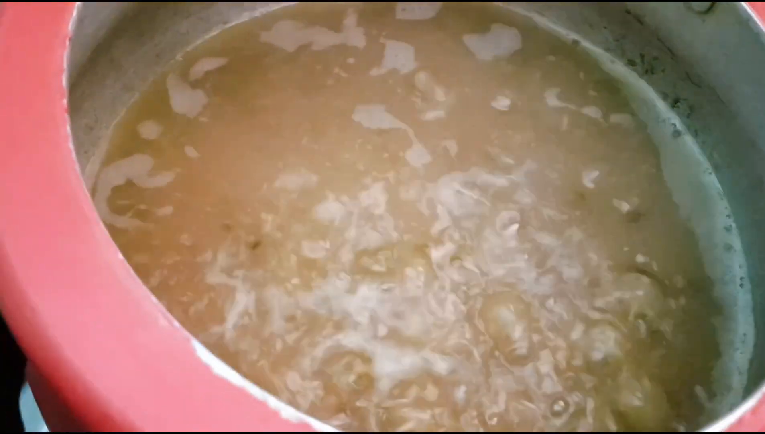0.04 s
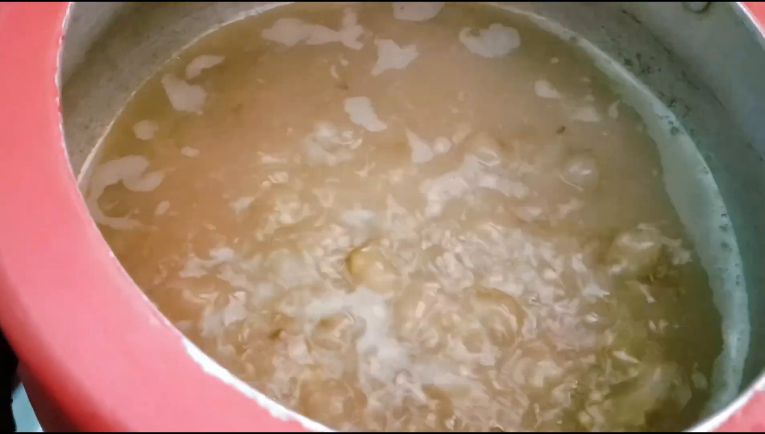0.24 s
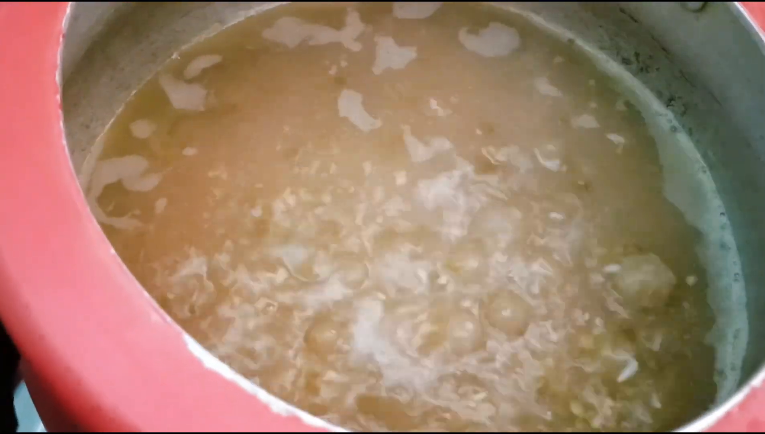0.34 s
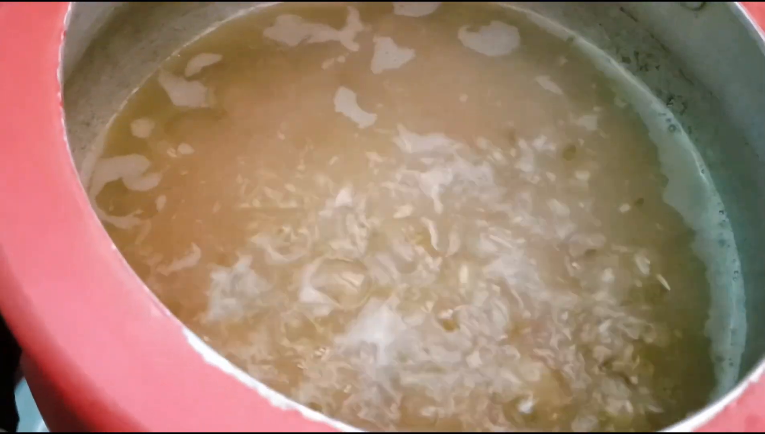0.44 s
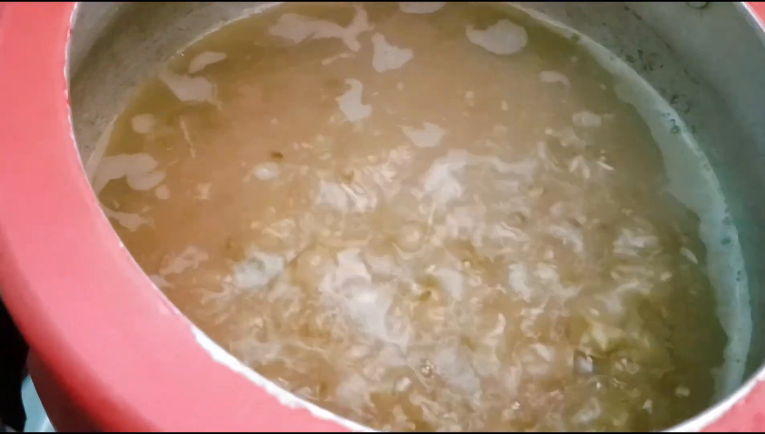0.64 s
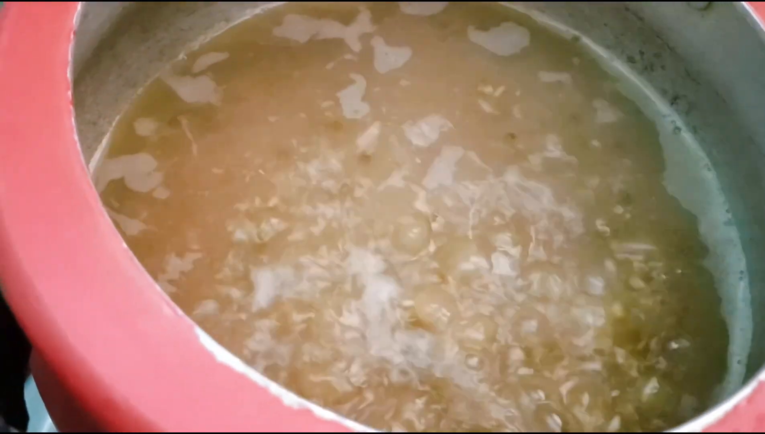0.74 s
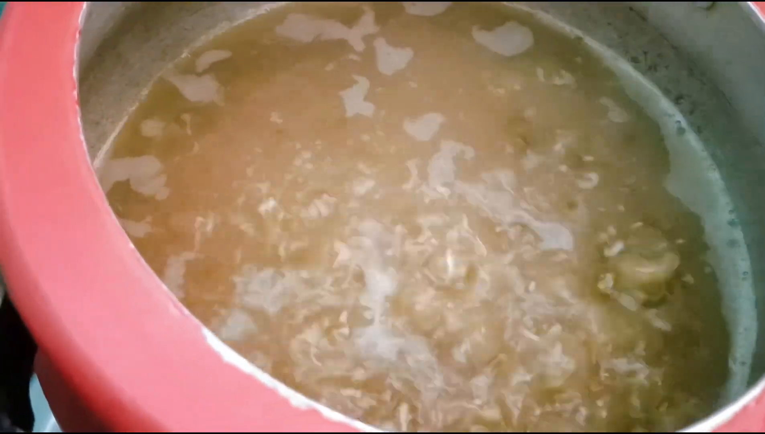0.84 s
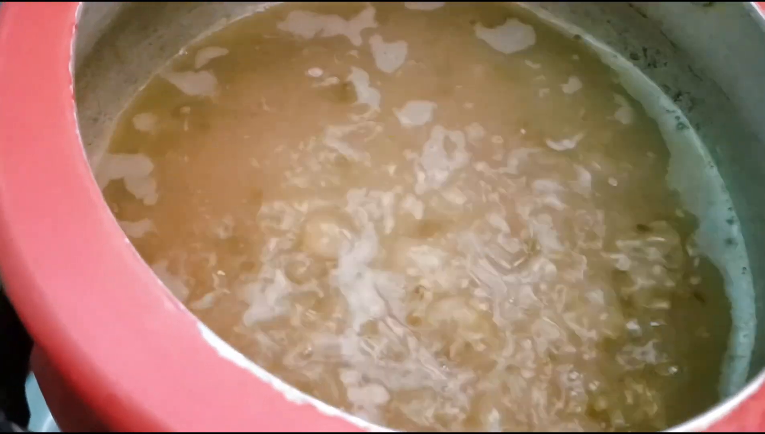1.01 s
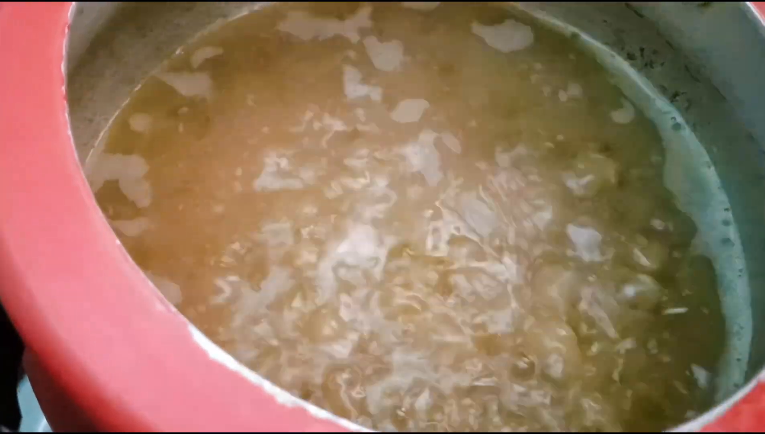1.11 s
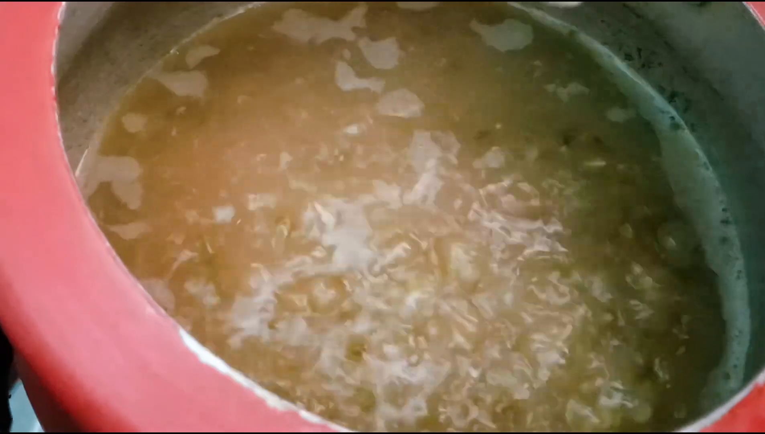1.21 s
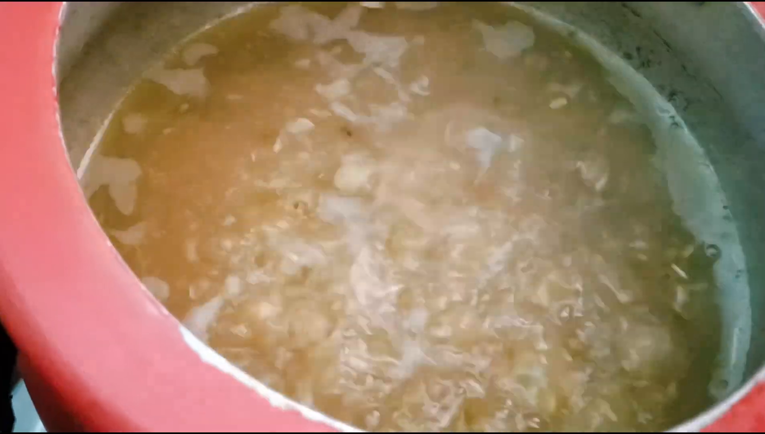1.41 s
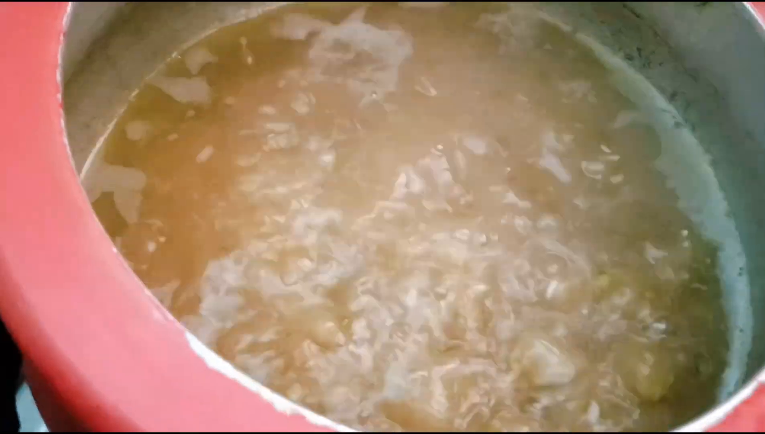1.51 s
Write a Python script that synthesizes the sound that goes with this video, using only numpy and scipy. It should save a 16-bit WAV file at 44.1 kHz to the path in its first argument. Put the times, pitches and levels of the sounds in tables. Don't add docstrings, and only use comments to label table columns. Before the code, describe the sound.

Close to a pot, one hard splashy plop and a gentler one follow quickly, then quiet bubbling swells with small pops, a brief spit on the hot rim, over low stove rumble and faint hiss.

```python
import sys
import numpy as np
from scipy import signal
from scipy.fft import rfft, irfft
from scipy.io import wavfile
from scipy.ndimage import uniform_filter1d

SR = 44100
rng = np.random.default_rng(int(sys.argv[2]) if len(sys.argv) > 2 else 0)


def decibels_to_gain(level_db):
    exponent = np.asarray(level_db, float) / 20
    return 10 ** exponent


def generate_wav(sig):
    pcm = np.round(np.clip(np.atleast_2d(sig).T, -1, 1) * 32767).astype(np.int16)
    wavfile.write(sys.argv[1], SR, pcm)


N = 68355
SIDES = np.array([[1], [-1]])

# f/Hz, side-mid level/dB
HISS_SIDE = [(30, -8), (150, -19), (380, -8), (1290, 0), (6000, -1), (8300, -14), (11700, -34), (12500, -1)]
# f/Hz, left-right level/dB
HISS_PAN = [(60, 1), (2400, -2), (4400, 3.5), (15000, 3.5)]


def unit(x):
    return x / np.sqrt(np.mean(x ** 2))


def colour(x, table, pan=((1, 0), (2, 0))):
    log_hz = np.log(np.maximum(np.fft.rfftfreq(4096, 1 / SR), 1))

    def read(points):
        hz, db = np.array(points, float).T
        return np.interp(log_hz, np.log(np.maximum(hz, 1)), db)

    gain_db = np.maximum(read(table), -60) + SIDES * read(pan) / 2
    cepstrum = irfft(np.log(decibels_to_gain(gain_db)))
    folded = np.concatenate([cepstrum[:, :1], 2 * cepstrum[:, 1:2048], np.zeros((2, 2048))], axis=1)
    response = irfft(np.exp(rfft(folded)))
    return signal.fftconvolve(x * np.ones((2, 1)), response, axes=1)[:, :N]


def band(x, hz, width):
    return signal.lfilter(*signal.iirpeak(hz, hz / width, fs=SR), x)


def ring(x, modes, split=0):
    out = 0
    for k, (hz, db, t60, pan_db) in enumerate(modes):
        for side in (1, -1):
            detune = side * (-1) ** k * split / 2 * (hz > 400)
            twin_hz = hz * (1 + detune)
            pole = np.exp(2j * np.pi * twin_hz / SR - np.log(1000) / (t60 * SR))
            mode = signal.lfilter([1], [1, -pole], x).imag
            out = out + (SIDES == side) * decibels_to_gain(db + side * pan_db / 2) * mode
    return out


def walk(rate):
    k = int(SR / rate)
    held = np.repeat(rng.standard_normal(N // k + 1), k)
    return unit(uniform_filter1d(uniform_filter1d(held, k), k)[:N])


def bubble(t, hz, cycles, glide):
    turns = np.maximum(t, 0) * hz
    fade = np.exp(-3 * turns / cycles) * (1 - np.exp(-turns / 0.86))
    return np.sin(2 * np.pi * turns * (1 + glide * turns / cycles / 2)) * fade


def splatter(t, stages, spray, pan):
    drops = rng.standard_normal((2, N)) * decibels_to_gain(3.5 * np.minimum(rng.exponential(size=(2, N)), 3))
    apart = 1.15
    right = (drops[0] + apart * drops[1]) / np.hypot(1, apart)
    voice = unit(colour(np.array([drops[0], right]), spray, pan))
    out = np.zeros((2, N))
    for start, length, db, fade_db, top_hz in stages:
        at = (t - start) / length
        level = decibels_to_gain(db + fade_db * np.clip(at, 0, 1)) * (at >= 0) * (at < 1)
        gate = uniform_filter1d(level, size=31)
        edge = ((330, top_hz), "band") if top_hz < SR / 4 else (1400, "high")
        out += gate * signal.lfilter(*signal.butter(3, *edge, fs=SR), voice)
    return out


def struck_pot(t, slaps, modes, late_s, ring_end_s, contact):
    def push(s):
        return np.exp(-((t - s) * SR / contact) ** 2)

    first_s, first_db = slaps[0]
    first = ring(push(first_s), modes, split=.035)
    short = [(hz, db, t60 * .04, pan_db) for hz, db, t60, pan_db in modes]
    one_thud = ring(push(.01), short)
    thuds = ring(sum(decibels_to_gain(db) * push(s) for s, db in slaps[1:]), short) / np.abs(one_thud).max()
    slap_db, ring_db, damp_s = -3, 5.5, .0015
    damped = np.exp(-np.maximum(t - ring_end_s, 0) / damp_s)
    struck = damped * (decibels_to_gain(slap_db) * thuds - decibels_to_gain(ring_db + first_db) * first / np.abs(first).max())
    return np.array([struck[0], np.interp(t - late_s, t, struck[1])])


def lump_sound(x):
    return signal.sosfilt(signal.butter(3, 123, "high", fs=SR, output="sos"), x)


def first_lump(t):
    # t/s, length/s, level/dB, fade/dB, top f/Hz
    stages = [
        (0.223, 0.049, -54, 18.5, 2690),
        (0.2425, 0.014, -7.5, -6, 16000),
        (0.255, 0.028, -22.5, -11.5, 2340),
        (0.286, 0.014, -29, -8.5, 2367),
        (0.309, 0.0294, -43.5, -11.5, 2440),
    ]
    # t/s, level/dB
    slaps = [
        (.2423, -5),
        (.2442, -7),
        (.2470, -8),
        (.2506, -7),
        (.2567, -9),
    ]
    # f/Hz, level/dB, t60/s, left-right level/dB
    modes = [(170, -4, .15, 1), (317, -3, .15, -3), (470, 2, .2, -4), (620, -4, .15, -8),
             (820, -5, .15, -1), (1020, -5, .15, 1), (1120, -5, .2, 3), (1513, -8, .2, 2),
             (1690, -7, .15, 1), (1960, -2, .12, 4), (2115, -1, .08, -3), (2315, -3, .1, -3),
             (3130, -19, .08, 3), (4050, -11, .04, 6)]
    # f/Hz, level/dB per Hz
    spray = [(60, -20.5), (450, 7.5), (2300, -10.5), (4200, -15), (6300, -20.5), (8200, -33.5),
             (10500, -30), (16000, -46.5)]
    # f/Hz, left-right level/dB
    pan = [(125, 1.5), (500, -3), (1000, 2), (2200, -1.5), (4400, 6), (8500, -4), (13000, 5)]
    struck = struck_pot(t, slaps, modes, late_s=.00013, ring_end_s=.2578, contact=.8)
    return lump_sound(splatter(t, stages, spray, pan) + struck)


def second_lump(t):
    # t/s, length/s, level/dB, fade/dB, top f/Hz
    stages = [
        (.5325, .0075, -31, 6, 16000),
        (0.540, 0.013, -24, -15, 16000),
        (0.551, 0.026, -30, -13, 1500),
        (0.577, 0.02, -40, -10, 800),
        (.612, 0.02, -42, -10, 700),
    ]
    # t/s, level/dB
    slaps = [
        (.5320, -15.5),
        (0.5362, -19),
        (0.5424, -12),
        (0.5454, -14),
        (.5477, -17),
    ]
    # f/Hz, level/dB, t60/s, left-right level/dB
    modes = [(240, -9, .08, 0), (325, 3, .06, -1), (620, -5, .15, -1), (930, -11, .1, 1),
             (1110, -4, .04, -2), (1350, -12, .1, 1), (1890, -13, .08, 1), (2213, -16, .08, 1),
             (2380, -17, .08, 1), (3700, -24, .04, 2)]
    # f/Hz, level/dB per Hz
    spray = [(60, -29), (380, 3.5), (1100, -9), (2300, -7), (4000, -26.5), (6000, -27.5), (8200, -45),
             (16000, -42.5)]
    # f/Hz, left-right level/dB
    pan = [(125, 0), (500, -1), (2000, 1), (6000, 3)]
    struck = struck_pot(t, slaps, modes, late_s=.0001, ring_end_s=.551, contact=3.0)
    return lump_sound(splatter(t, stages, spray, pan) + struck)


def gulps(t):
    # t/s, peak level/dB, f/Hz, decay/cycles, glide/1
    trapped = [
        (0.259, -19.5, 190, 7.8, -0.12),
        (0.272, -19, 138.7, 5.35, -0.065),
        (0.5423, -15, 360, 9.9, 0.028),
        (.5584, -20.5, 203, 6.9, -0.12),
        (0.584, -33, 197, 5.4, -0.058),
    ]
    return sum(decibels_to_gain(db) * bubble(t - s, hz, cycles, glide) for s, db, hz, cycles, glide in trapped)


def rim_sizzle(t):
    # t/s, rise/s, t60/s, level/dB, tilt/dB per octave
    sizzles = [
        (1.1685, .002, .02, -47, 0),
        (1.1722, .001, .01, -32, 3),
        (1.1765, .003, .014, -37.5, -2),
        (1.193, .007, .09, -59, 7),
        (1.198, .005, .03, -47, -3),
        (1.2068, .0012, .04, -37, -5),
    ]
    # f/Hz, width/Hz, left level/dB, right level/dB
    sizzle_bands = [(2250, 990, -30, -2), (3760, 350, -13.5, 2.5), (4460, 570, -3.5, 5.5),
                    (6210, 700, 4, -17.5), (11470, 4140, -4, 9.5), (14040, 1200, 3, -20)]
    spit = unit(rng.standard_normal(N) * decibels_to_gain(2.2 * rng.exponential(size=N)))
    out = 0
    for hz, width, left_db, right_db in sizzle_bands:
        shape = 0
        for s, rise, t60, db, tilt_db in sizzles:
            envelope = np.exp(np.minimum((t - s) / rise, -np.log(1000) * (t - s) / t60))
            shape = shape + decibels_to_gain(db + tilt_db * np.log2(hz / 5000)) * envelope
        side_gain = decibels_to_gain(np.array([[left_db], [right_db]]) - 10.5)
        out = out + shape * side_gain * unit(band(band(spit, hz, width), hz, width))
    return out


def rim_tick(t):
    # f/Hz, level/dB, t60/s, left-right level/dB
    rim_modes = [(2230, 0, .035, -12), (2905, -9, .03, -3), (3500, -2, .012, -1), (3950, -4, .011, -1),
                 (4420, -2, .014, -1), (10000, -2, .005, -10), (1710, -15, .02, -3)]
    tick_s, hold_s, damp_s = 1.2065, .009, .003
    contact = np.exp(-((t - tick_s) * SR / 0.46) ** 2)
    tick = ring(contact, rim_modes) * np.exp(-np.maximum(t - tick_s - hold_s, 0) / damp_s)
    tick = signal.lfilter(*signal.butter(2, (5000, 8600), "stop", fs=SR), tick)
    return decibels_to_gain(-28) * signal.sosfilt(signal.butter(6, 1800, "high", fs=SR, output="sos"), tick)


def gurgle(t):
    count = 170
    start = rng.uniform(-0.091, N / SR, count)
    hz = 190 * np.exp(.35 * rng.standard_normal(count))
    size = rng.exponential(size=count)
    total = sum(decibels_to_gain(3.0 * e) * bubble(t - s, f, 6.3, 0.15) for s, f, e in zip(start, hz, size))
    return decibels_to_gain(-58) * unit(total)


def pops(t):
    # t/s, peak level/dB, f/Hz, left-right level/dB
    bursts = [(.712, -49, 1170, -2.5), (.815, -53, 2400, 0), (.821, -50, 2650, 1), (.832, -54, 1700, 0),
              (1.058, -51, 1480, 0), (1.066, -53, 2300, 0), (1.129, -52, 1090, 0), (1.14, -54, 1150, 0),
              (1.172, -49, 1080, 0), (1.238, -54, 3650, 0), (1.296, -52, 2920, 1), (1.357, -52, 1180, -2),
              (1.378, -50, 1130, 1), (1.386, -55, 2350, 0), (1.516, -44, 1950, -.5), (1.522, -51, 2350, 0),
              (1.531, -51, 2900, 0)]
    out = 0
    for s, db, hz, pan_db in bursts:
        rise = np.clip((t - s) / .002, 0, 1)
        tone = bubble(t - s, hz, cycles=hz * .02, glide=.06)
        out = out + decibels_to_gain(-6 + db + SIDES * pan_db / 2) * tone * rise
    return out * (1 + .9 * np.array([walk(900), walk(900)]))


def boil_db(t):
    # t/s, level/dB
    boil = [(0, -12), (.2, -12), (.65, -9), (.76, -6), (.82, 0), (.9, -1), (.95, -3), (.98, 2), (1.05, 1),
            (1.065, -10), (1.15, -14), (1.3, -10), (1.42, -10), (1.49, -1), (1.55, -2)]
    return np.interp(t, *np.array(boil, float).T)


def fizz(t, grains):
    # f/Hz, level/dB
    fizz_bands = [(500, -0.5), (1200, -16), (2500, -7.5), (4000, -7), (6000, -6), (8500, -16), (11500, -7),
                  (15000, -10)]
    wide = grains[0] + SIDES * colour(grains[1], HISS_SIDE)
    level_db = -60 + boil_db(t) + 1.2 * walk(60)
    return unit(colour(wide, fizz_bands, HISS_PAN)) * decibels_to_gain(level_db)


def hollow_air(t, grains):
    # f/Hz, width/Hz, level/dB
    air_modes = [(1150, 150, -73), (1480, 150, -79), (2450, 300, -72)]
    out = 0
    for hz, width, db in air_modes:
        level_db = db + .4 * boil_db(t) + 2.5 * walk(35)
        out = out + decibels_to_gain(level_db) * unit(band(grains, hz, width))
    return out


def simmer(t):
    grains = rng.standard_normal((2, N)) * decibels_to_gain(2.8 * rng.exponential(size=(2, N)))
    return gurgle(t) + pops(t) + fizz(t, grains) + hollow_air(t, grains)


def kitchen():
    # f/Hz, level/dB per Hz (the last two points give way to the hiss)
    rumble = [(12, -50), (20, -6.5), (124, -3.5), (190, -12.5), (226, 2), (317, -23.5), (353, -6.5),
              (800, -22.5), (1040, -62), (1760, -120)]
    # f/Hz, level/dB per Hz
    hiss = [(1000, -24), (2400, -28.5), (4000, -32.5), (6000, -34), (8300, -42.5), (11300, -29.5),
            (13200, -38.5), (15500, -32.5)]
    noise = rng.standard_normal((2, N))
    both = noise[0] + SIDES * colour(noise[1], HISS_SIDE)
    whole = rfft(colour(both, list(rumble[:-2]) + list(hiss), HISS_PAN))
    edges = [0, *(150 * 2. ** np.arange(7)), SR]
    f = np.fft.rfftfreq(N, 1 / SR)
    out = 0
    for low, high in zip(edges, edges[1:]):
        out = out + decibels_to_gain(1.1 * walk(15)) * irfft(whole * ((f >= low) & (f < high)), N)
    return decibels_to_gain(-55) * unit(out)


def room(near, t):
    tail = rng.standard_normal((2, N)) * decibels_to_gain(-60 * t / 0.22) * (t > .004)
    tail = signal.lfilter(*signal.butter(2, 1288, fs=SR), tail)
    tail = tail / np.sqrt(np.sum(tail ** 2) / 2)
    return decibels_to_gain(-32.5) * signal.fftconvolve(near, tail, axes=1)[:, :N]


def scene():
    t = np.arange(N) / SR
    near = first_lump(t) + second_lump(t) + gulps(t) + rim_sizzle(t) + rim_tick(t)
    return near + room(near, t) + simmer(t) + kitchen()


def roll_off(x):
    return signal.sosfilt(signal.butter(12, 16000, fs=SR, output="sos"), x)


def record(dry):
    low_pass = signal.ellip(8, .2, 60, 15900, fs=SR, output="sos")
    mix = signal.sosfilt(low_pass, np.tanh(dry))
    return roll_off(mix)


dry = scene()
out = record(dry)
generate_wav(out)
```